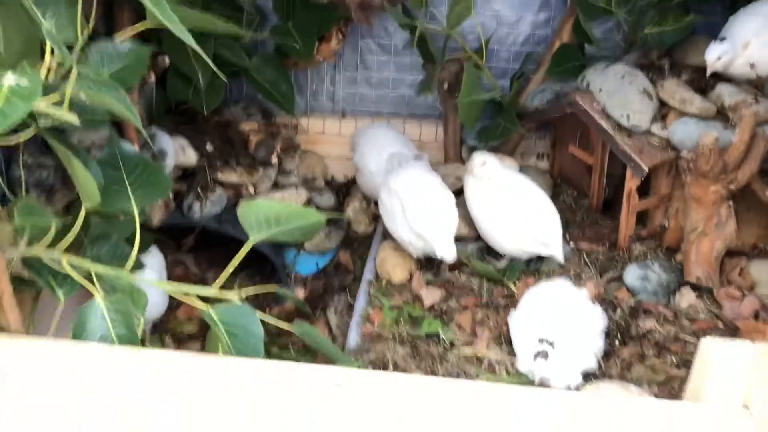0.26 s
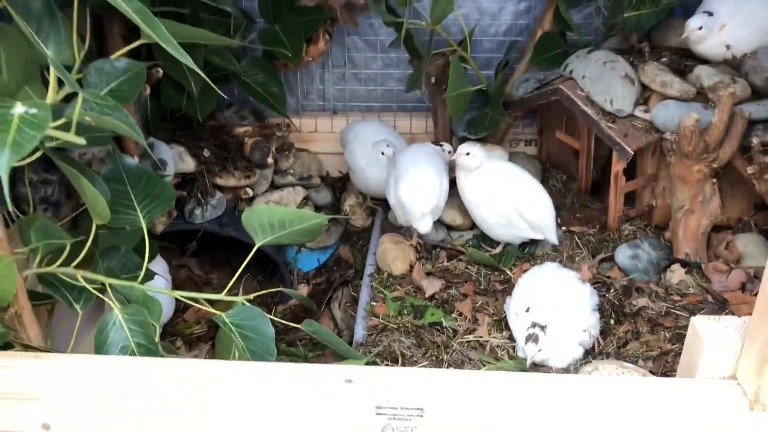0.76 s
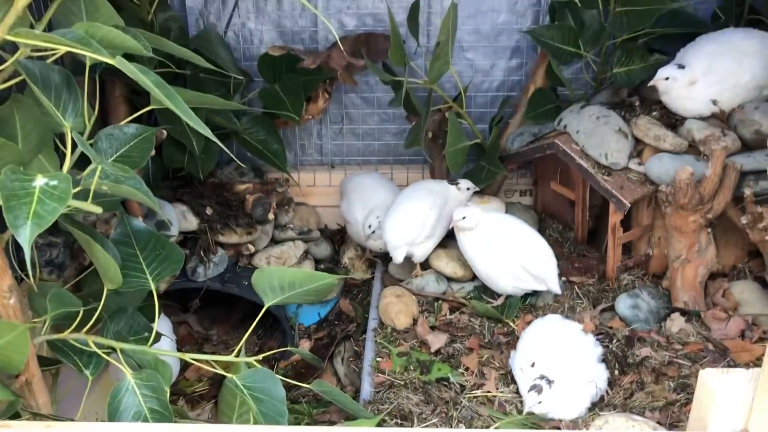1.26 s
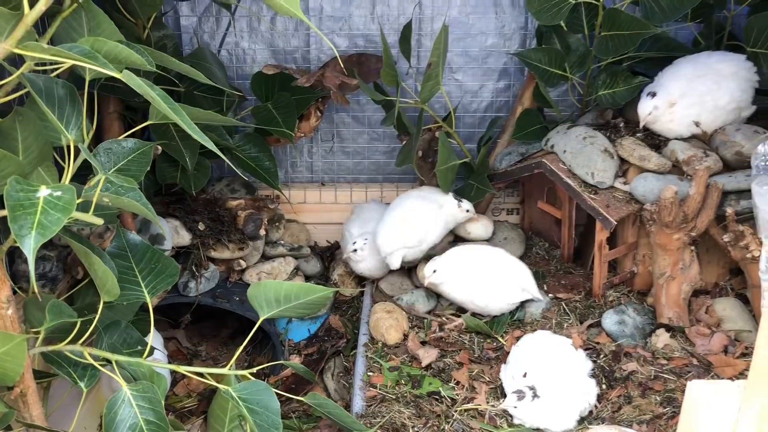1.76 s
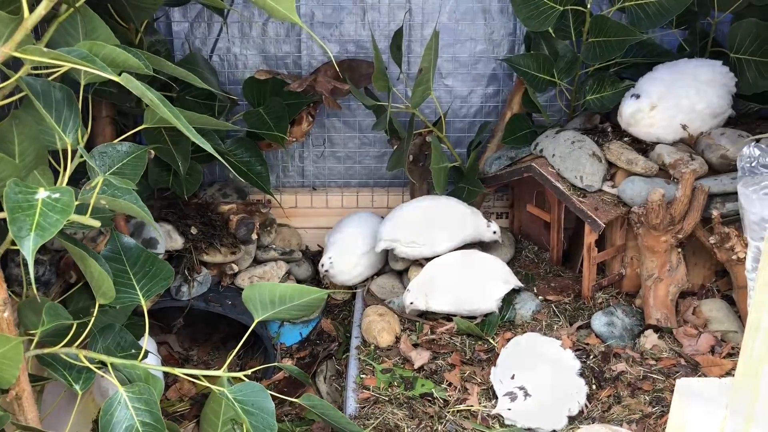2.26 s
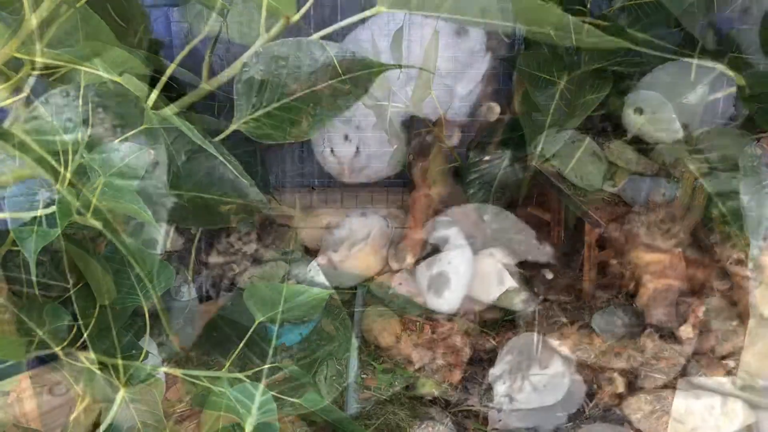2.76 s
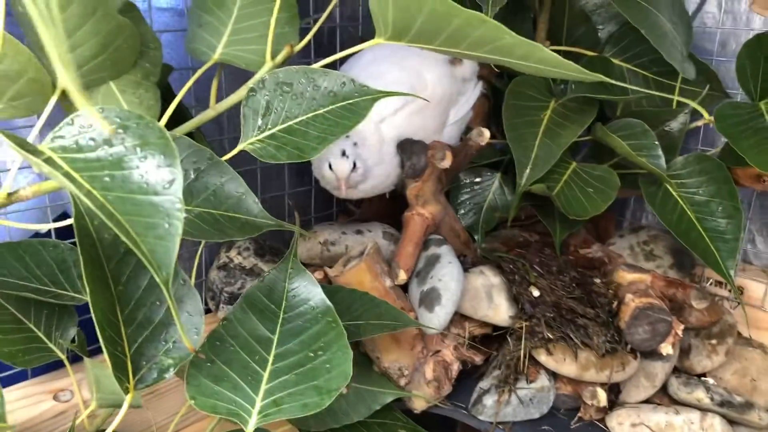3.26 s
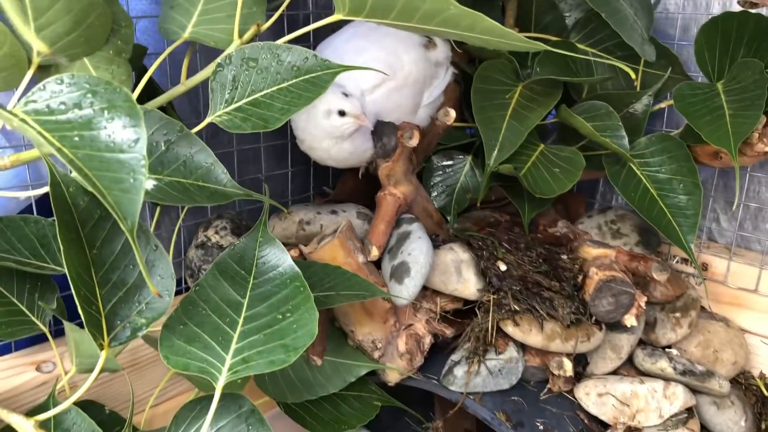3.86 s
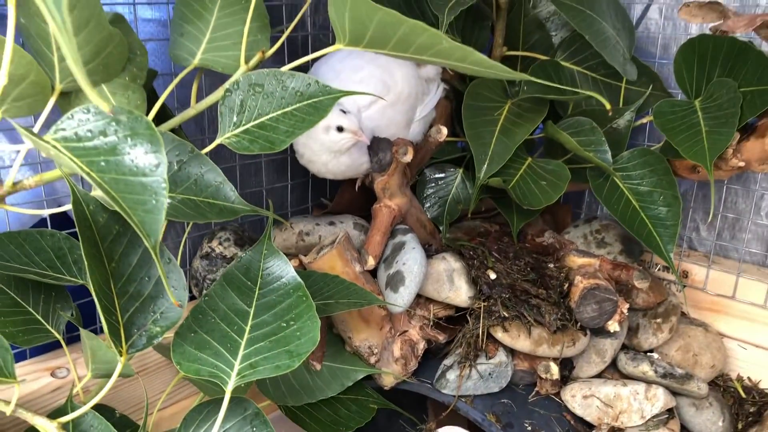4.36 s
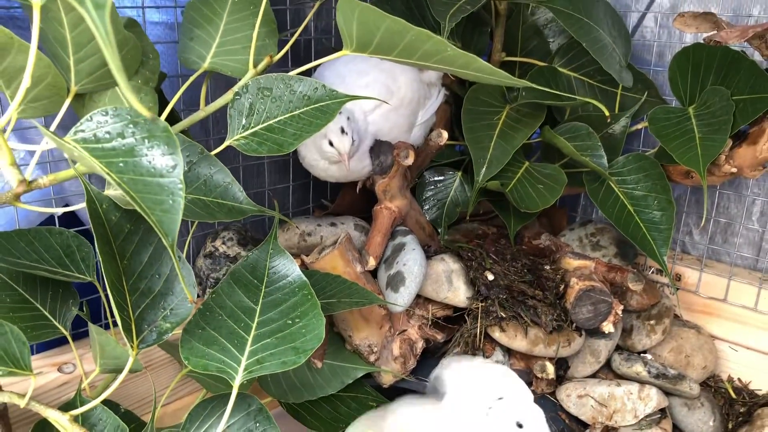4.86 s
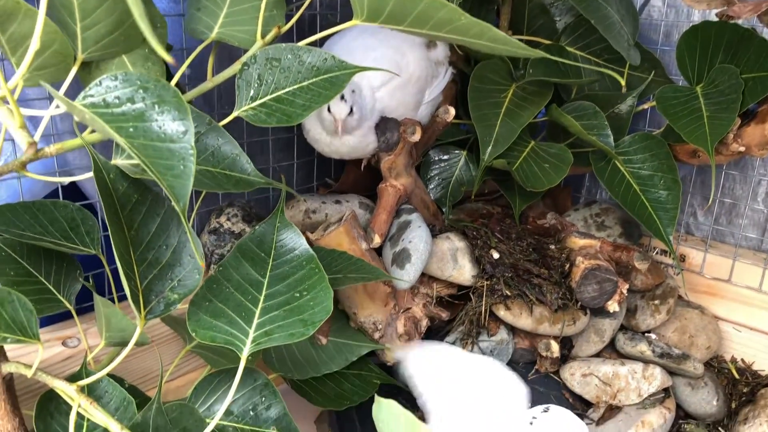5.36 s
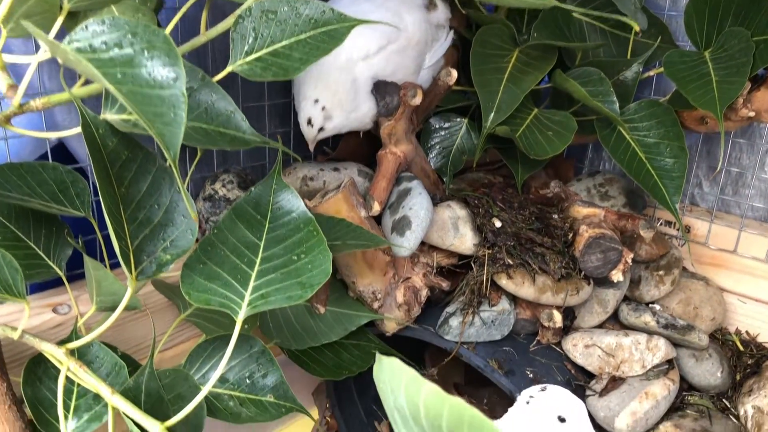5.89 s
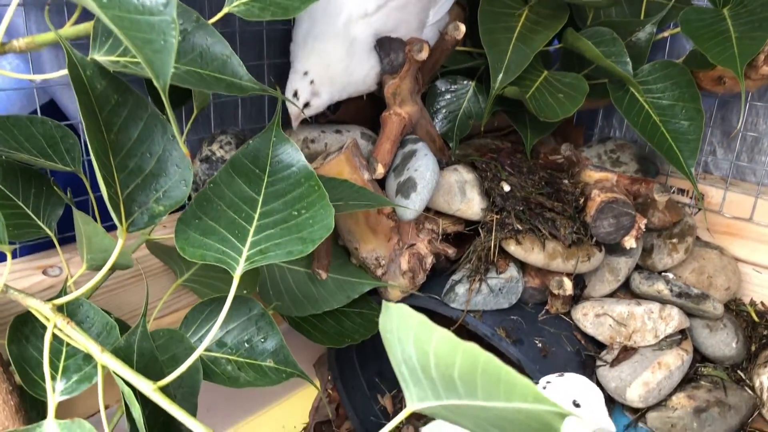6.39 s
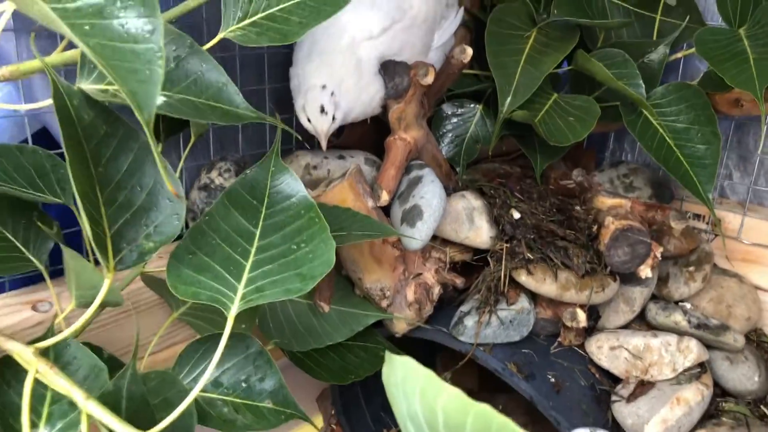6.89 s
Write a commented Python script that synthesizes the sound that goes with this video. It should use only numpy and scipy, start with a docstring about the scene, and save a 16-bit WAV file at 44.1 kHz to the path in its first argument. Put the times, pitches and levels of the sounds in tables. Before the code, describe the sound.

White quail rustle and crunch through dry leaf litter with crisp snaps, light bumps and tiny soft peeps, over a faint low outdoor rumble.

```python
"""Quail in a littered pen

Quail potter about in an outdoor pen littered with dry leaves, twigs and pebbles. Their feet crush and drag
the litter: filtered impulse trains and noise crackle finely, and short noise bursts make the sharp snaps.
Wavering sine tones are soft peeps; decaying sines are pings of the wire mesh and thuds on the ground.
Claws scrape as band-passed noise, and coloured noise gives a low outdoor rumble and a faint hiss."""
import sys
import numpy as np
from scipy import signal
from scipy.fft import rfft, irfft, next_fast_len
from scipy.io import wavfile
from scipy.ndimage import uniform_filter1d

SR = 44100
rng = np.random.default_rng(int(sys.argv[2]) if len(sys.argv) > 2 else 0)


def generate_wav(sig):
    """Save sig (samples, or channels by samples) to the path in sys.argv[1] as 16-bit PCM at SR."""
    pcm = np.round(np.clip(np.atleast_2d(sig).T, -1, 1) * 32767).astype(np.int16)
    wavfile.write(sys.argv[1], SR, pcm)


N = 314433
TIME = np.arange(N) / SR  # s

# Level of the outdoor rumble over time. Each row: time in seconds, level in dB before its random swell.
RUMBLE = [(0, -58), (.4, -61), (1.2, -60), (1.6, -61), (1.85, -64.5), (2, -60), (2.7, -65), (3.4, -59.5),
          (3.7, -62.5), (4.35, -59.5), (4.95, -60.5), (5.15, -64), (5.85, -63.5), (5.98, -53.5), (6.1, -63),
          (6.22, -59), (6.6, -62), (7.13, -61.5)]
# Spectra of rumble and hiss. Each row: frequency in Hz, relative density in dB per Hz.
RUMBLE_COLOUR = [(20, -30), (32, -18.5), (48, -2), (80, 1.5), (125, -1.5), (200, -6), (300, -11.5),
                 (500, -29.5), (1200, -66)]
AIR_COLOUR = [(100, -1.5), (400, 4.5), (1000, -5), (2500, -11), (6000, -15.5), (10000, -19), (16000, -20)]

# Wires of the mesh set ringing. Each row: start in seconds, frequency in Hz, level in dB, t60 in seconds.
PINGS = [(5.933, 2850, -38.5, 0.068), (5.985, 6780, -35, 0.051), (5.985, 1580, -22, 0.017)]
# Soft footfalls and bumps on the ground. Each row: start in seconds, frequency in Hz, level in dB,
# t60 in seconds.
THUDS = [(.471, 900, -27.5, 0.0079), (.62, 85, -48, .15), (2.954, 724, -26, 0.0089),
         (2.98, 480, -61, 0.027), (3.35, 547, -33.5, 0.033), (3.379, 875, -34.5, 0.044),
         (3.487, 1070, -37, .02), (3.94, 510, -45, 0.059), (4.086, 642, -43, 0.066),
         (4.65, 117, -43.5, 0.17), (4.91, 110, -48.5, 0.29), (5.97, 129, -32.5, 0.065),
         (6.2, 102, -44.5, 0.2), (7.026, 510, -45, .05)]
# Claws scraping on wood or stone. Each row: start in seconds, length in seconds, resonance in Hz, level in dB.
SCRAPES = [(3.777, 0.038, 2100, -57.5), (4.192, 0.029, 2130, -54), (4.398, 0.028, 1980, -55),
           (5.545, .027, 2080, -57.5)]

# Short peeps. Each row: start in seconds, length in seconds, pitch in Hz at start, middle and end,
# level in dB before the trim common to all peeps.
PEEPS = [ (.755, .06, 2550, 2250, 1720, -62), (.855, .04, 2520, 2120, 1830, -60),
         (1.02, .05, 2400, 2400, 2230, -59), (1.075, .035, 3070, 2980, 2700, -65),
         (1.405, .04, 2420, 2490, 2420, -65), (1.532, .072, 3050, 2230, 1780, -60),
         (1.61, .036, 3750, 3130, 2850, -62), (1.855, .085, 1170, 1620, 1500, -65),
         (1.968, .066, 2200, 2030, 1820, -62), (2.04, .026, 2700, 3800, 3300, -68),
         (2.91, .035, 3140, 2880, 2560, -61), (2.99, .03, 3320, 3080, 2750, -58),
         (3.435, .028, 3100, 2820, 2650, -43), (3.745, .055, 3240, 2600, 2050, -58),
         (4.995, .055, 1950, 1780, 1570, -62), (5.06, .075, 3240, 2300, 1760, -60),
         (5.143, .03, 3560, 3430, 3060, -55), (5.335, .052, 2960, 3290, 3000, -62),
         (6.668, .07, 2920, 2290, 1830, -55), (6.742, .03, 3740, 3460, 3080, -55)]
# Longer calls, a low note that flips up into a squeak. Each row: start in seconds, note length and squeak
# length in seconds, note and squeak pitch in Hz, note and squeak level in dB, climb in octaves per second.
RISING_CALLS = [(4.584, 0.048, 0.024, 1556, 3130, -54, -40.5, 2),
                (5.622, 0.065, 0.03, 2310, 3815, -52, -44.5, 3.1),
                (6.243, .041, .027, 1380, 2850, -52.5, -50.5, 17)]
FLIP_S, SAG_PER_S = .0016, 8  # time of the flip (s); relative fall of the squeak (per s)

# Spectra of the three litter layers. Each row: frequency in Hz, relative density in dB per Hz.
SOIL_COLOUR = [(100, -37), (220, -3), (350, -1), (800, 0), (1150, -2), (1500, -3), (2500, -33)]
BLADE_COLOUR = [(600, -64), (1000, -8), (1300, -1), (1800, 3.5), (2200, 0), (2900, 0.5), (3600, 2),
                (5500, -4)]
EDGE_COLOUR = [(1500, -29), (2500, -20), (3200, -6.5), (5000, 1), (7500, 0), (11000, -4), (16000, -6)]
# A foot pressed or dragged through the litter. Each row: start in seconds, length in seconds, level in dB,
# soil and crisp edges in dB relative to the leaf blades.
STROKES = [(0.071, 0.095, -50, 6, 5.5), (.16, 0.16, -52, 2, -1), (.34, 0.13, -57, 7, 1),
           (0.606, 0.076, -47.5, 2, 0), (.65, 0.095, -57, 7.5, -3), (1.2, .06, -66.5, 6, -1),
           (1.27, 0.11, -65.5, 3.5, 1), (1.53, 0.038, -66.5, 5.5, 3), (1.725, 0.032, -72.5, 0, 11),
           (1.985, 0.025, -57.5, -0.5, -9), (2.75, 0.076, -64, 5, -3), (2.92, .1, -65, 10, -6),
           (3.035, 0.04, -56, 4, 4), (3.175, .025, -69, 12.5, 6), (3.246, 0.068, -55, 2.5, 3),
           (3.295, 0.096, -42, -2.5, 0), (3.38, 0.092, -47, 4.5, 1.5), (3.469, 0.16, -51.5, 3.5, 0.5),
           (3.6, 0.14, -56, 0.5, 6.5), (3.76, .11, -63.5, -2.5, 0), (3.91, 0.085, -64.5, 2, 4),
           (4.075, 0.037, -60, 4.5, 0.5), (4.185, 0.063, -61.5, -2, 0), (4.28, 0.036, -66, 5.5, 3),
           (4.369, .06, -56, -5, 2.5), (4.48, .045, -50, -14, 0.5), (4.575, 0.07, -59, -7, 3.5),
           (4.79, 0.073, -58, -15, 5), (4.905, 0.05, -57, -8, 2), (5.151, .045, -63, -6, 4.5),
           (5.236, 0.051, -54.5, -13, -5), (5.421, 0.034, -60.5, 0.5, -4), (5.544, .03, -60.5, -3, 1),
           (5.869, 0.059, -46.5, -24, -15), (5.92, .14, -55, -7, 3.5), (6.16, 0.1, -60, 0, 4),
           (6.325, 0.059, -64.5, 8, 7), (6.55, 0.083, -53.5, -1.5, 1.5), (6.82, 0.08, -55, 0.5, 2.5),
           (6.9, 0.079, -54, -5, 3.5), (7.07, 0.078, -66, -12, 10)]
STROKE_SKEW, STROKE_ROUND = 0.77, 0.73  # weight comes on faster than it lifts; a lower power holds it longer
# How busily the litter is stirred between strokes. Each row: time in seconds, level in dB.
STIR = [(0, -66.5), (.55, -61.5), (.85, -64), (1, -68), (1.4, -73.5), (1.7, -78.5), (2.2, -81),
        (2.55, -72.5), (2.72, -84.5), (2.83, -66.5), (3.2, -70.5), (4.05, -74), (4.6, -67.5), (5.3, -72),
        (5.55, -74.5), (6.25, -68), (6.48, -73), (6.75, -68.5), (7.13, -66)]
# Gain of that stirring in soil, leaf blades and crisp edges, each in dB.
STIR_MIX_DB = [2, 1.5, 2.5]

# Snaps of leaf, twig or grit. Each row: start in seconds, level in dB, brightness in dB per band,
# low flexing in dB and after-crunch in dB, the last two relative to the snap.
SNAPS = [(0.007, -44.5, 1, -9, -24), (0.023, -47.5, 3.5, -16, 1), (0.031, -42, 4, -15, -27),
         (0.0528, -37.5, 9, -9.5, -25), (0.1883, -40.5, 5.5, -19, -24), (0.2155, -45, 1, -2, -4),
         (0.2852, -41.5, -0.5, -20, -9), (0.2961, -50, 5, -7, -11), (0.332, -50.5, -1, 0, -4),
         (0.3568, -47, 3, -16, -14.5), (0.3873, -44, 1.5, -12, -6), (0.4051, -46, -6, -19, -17),
         (0.4353, -48, 6, -20, -22), (0.4722, -40.5, -3.5, 1, -23), (0.517, -44, -0.5, -22, 1),
         (0.5356, -40, 3, -20, -12), (0.5484, -32.5, 9, -30, -21), (0.57, -40, 3.5, -23, -17),
         (0.6101, -40, 1.5, -12, 0.5), (0.644, -41.5, 4, -11, -9), (0.728, -50, 4, 0.5, -15),
         (0.7344, -45, 5, -14, -7), (0.7469, -45, 1, -20, -8), (0.777, -42, -8, -0.5, -29),
         (0.801, -47, -2, -9, -16), (0.8536, -50, 2, -16, -15), (0.9074, -39, -2, -15, -24),
         (0.9293, -49.5, 10, -25, -18), (1.08, -48, 2.5, -20, -20), (1.2072, -49.5, 2, 1, -12),
         (1.2298, -48.5, -1, -12, -23), (1.2907, -52.5, 7.5, -3, -16), (1.3377, -54, -1, -1, -1),
         (1.5012, -54, 1, -18, -10), (1.768, -56, -5.5, -8, 0), (2.0025, -47.5, -3.5, -7, -18),
         (2.2313, -63, 5, -9, -14), (2.27, -58, 1.5, -18, -16), (2.3241, -60.5, 2, -3, -6),
         (2.5991, -64, 7, -8, -17), (2.6262, -51, 3.5, -24, -13), (2.689, -53.5, 1.5, -18, -15),
         (2.7395, -55.5, -4, -16, -9), (2.8578, -50.5, 2.5, 2, -3), (2.8888, -48.5, -6, -5.5, -19),
         (2.9547, -36.5, -4, -9, -20), (2.9807, -38, -4, -4, -11), (3.0211, -42.5, 0, -12, -10),
         (3.047, -45, -4, -5, -10), (3.0533, -46, 10, -10, -15), (3.0551, -39.5, 0, -10, -20),
         (3.2388, -56, -2, -18, -6), (3.3809, -42, 5.5, 5, -4), (3.4335, -36, -1, -10, -11),
         (3.464, -47.5, 10, 2, -21), (3.5028, -37.5, -2, -5, -11), (3.5242, -48.5, 8.5, 1, -10),
         (3.5412, -40.5, 1, -8, -19), (3.5589, -40.5, -2.5, -17, -20), (3.5862, -43.5, -1, -16, -7),
         (3.6124, -42, 5, -19, -11), (3.641, -36.5, 1, -14, -20), (3.6832, -40, -2.5, -6, -17),
         (3.6972, -41.5, 0.5, -24, -22), (3.7585, -49.5, -1, -18, -23), (3.8395, -52.5, -3, -19, -13),
         (4.0155, -50.5, 0.5, -11.5, 7.5), (4.095, -52.5, 2, 0, -7), (4.117, -52, 1, -12, -12),
         (4.2473, -47.5, -1.5, -16, 3), (4.3631, -52, -3, -18, -11), (4.3828, -48, -6.5, -2, -15),
         (4.461, -47.5, 4, -22, -7), (4.5, -41, -6.5, -25, -8), (4.577, -47, 1, -13, 5.5),
         (4.6638, -63.5, -11, 12, 6.5), (4.777, -43.5, -5, -23, 5), (4.7879, -39.5, -1, -22, -2.5),
         (4.8089, -40.5, 1.5, -16, 1), (4.874, -48, 7.5, -19, -2), (4.9076, -41, -1, -3.5, 2),
         (4.9191, -44, -1, -12, 3.5), (5.0466, -49, -8, -13, -6), (5.2517, -56, -11, -3, -2),
         (5.332, -41.5, -4.5, -7.5, -18), (5.8967, -34, -2, -21, 1.5), (5.9021, -38, 2.5, -25, 6.5),
         (5.9329, -32, -3, -25, -5), (5.9363, -37, 0.5, -26, -4), (5.985, -28.5, -1, -26, -7),
         (5.991, -37, -5.5, -25, -16), (6.2557, -48.5, 1, -13, -20), (6.2672, -45.5, 0, -5, -23),
         (6.3107, -45.5, 4, -15, -19), (6.33, -53.5, -3, 2, 4), (6.4165, -44.5, 3.5, -14, -12),
         (6.4488, -53.5, -2.5, -10, -0.5), (6.5076, -49, 4.5, -25, -14), (6.5384, -52, 3, -3, -7),
         (6.5756, -48, 2, -18, -7), (6.6656, -51.5, -3, -6, -6), (6.741, -53.5, -4.5, -17, -5),
         (6.78, -53.5, -6, 4, -6), (6.8243, -43.5, -2.5, -18, -15), (6.833, -39, -3.5, -28, -2.5),
         (7.026, -43.5, 0, -5, -1.5), (7.0795, -45.5, 3, -2, -18)]
# Bands of a snap; slow flexing rings longer than fine fracture. Each row: low edge in Hz, high edge in Hz,
# decay time in seconds.
SNAP_BANDS = [(297, 1480, 0.0016), (1170, 3270, 0.00051), (2850, 7330, 0.00032), (6900, 15700, 0.00027)]
# Level of the upper three bands in a snap of middling brightness, each in dB.
SNAP_SHAPE_DB = [-4, -0.5, -2]
# Chance snaps of small bits: mean level above the stirring and its spread, spread of brightness per band
TICKS_PER_S, TICK_OVER_STIR_DB, TICK_SPREAD_DB, TICK_TILT_DB = 4, 13.5, 7, 3.5
TICK_FLEX_DB, TICK_CRUNCH_DB = -9, -8  # their low flexing and after-crunch

CUTOFF_HZ = 16100


def amp(db):
    """Level law: decibels to an amplitude ratio."""
    return 10 ** (np.asarray(db) / 20)


def unit(x):
    """Normalization: scales to rms 1."""
    return x / np.sqrt(np.mean(x ** 2) + 1e-20)


def add(mix, s, sound):
    """Superposition: adds a sound to the mix, in place, from s seconds on."""
    part = mix[max(round(s * SR), 0):][:len(sound)]
    part += sound[:len(part)]


def coloured(x, points):
    """Spectral shaping: weights x by a curve through (Hz, dB) points on a log axis, at rms 1."""
    hz, db = np.transpose(points)
    size = next_fast_len(N)
    bins = np.fft.rfftfreq(size, 1 / SR)
    gain = amp(np.interp(np.log(bins + 1), np.log(hz), db))
    return unit(irfft(rfft(x, size) * gain, size)[:N])


def band(x, low_hz, high_hz):
    """Causal band-pass: nothing sounds ahead of the excitation, so attacks stay sharp."""
    edges_hz = [low_hz, min(high_hz, .45 * SR)]
    return signal.sosfilt(signal.butter(3, edges_hz, "band", fs=SR, output="sos"), x)


def arch(length, skew, power):
    """Envelope: a warped half-sine swells from silence and trails off again."""
    u = np.linspace(0, 1, round(length * SR))
    return np.abs(np.sin(np.pi * u ** skew)) ** power


def outdoors(air_db=-70, rumble_db=0, swell_db=1, swell_s=.09):
    """Broadband noise: distant rumble of fluctuating level, under a faint even hiss."""
    swell = unit(uniform_filter1d(rng.standard_normal(N), size=round(swell_s * SR), mode="wrap"))
    level_db = np.interp(TIME, *np.transpose(RUMBLE)) + rumble_db + swell_db * swell
    rumble = amp(level_db) * coloured(rng.standard_normal(N), RUMBLE_COLOUR)
    hiss = amp(air_db) * coloured(rng.standard_normal(N), AIR_COLOUR)
    return rumble + hiss


def pen(x, top_hz=5000):
    """Scattering: sparse decaying echoes, short and dull, from boards, stones and plants."""
    t, t60 = np.arange(SR // 4) / SR, .17  # s
    chosen = rng.random(len(t)) < 2000 / SR  # about 2000 echoes per second
    taps = rng.standard_normal(len(t)) * chosen * (t > .003) * amp(-60 * t / t60)
    tail = band(taps, 190, top_hz)
    return signal.fftconvolve(x, tail / np.linalg.norm(tail))[:N]


def rings(table):
    """Damped resonance: struck things swell within a cycle and die away on one note."""
    out, t = np.zeros(N), np.arange(SR // 4) / SR
    for s, hz, db, t60 in table:
        envelope = amp(db - 60 * t / t60) * (1 - np.exp(-2 * hz * t))
        add(out, s, envelope * np.sin(2 * np.pi * hz * t))
    return out


def scrapes(half_width_octaves=0.27):
    """Friction: a claw's noisy rub over a hard surface excites one broad resonance of it."""
    out = np.zeros(N)
    grits = rng.standard_normal((len(SCRAPES), SR // 4))
    for (s, length, hz, db), grit in zip(SCRAPES, grits):
        press = arch(length, STROKE_SKEW, STROKE_ROUND)
        ring = unit(band(grit, hz / 2 ** half_width_octaves, hz * 2 ** half_width_octaves))
        add(out, s, amp(db) * press * ring[:len(press)])
    return out


def whistle(hz, gain, waver=0.016, rasp=0.56, rasp_hz=3400):
    """Modulated tone: a sine of unsteady pitch and strength turns raspy when pushed high."""
    noises = rng.standard_normal((3, SR // 4))
    wobble, flutter, sway = (unit(uniform_filter1d(noise, size=size))[:len(hz)]
                             for noise, size in zip(noises, (110, 36, 400)))  # sizes in samples
    strain = rasp * np.minimum(hz / rasp_hz, 1) ** 6
    strength = gain * amp(2 * sway) * (1 + strain * flutter)
    phase = 2 * np.pi * np.cumsum(hz * (1 + waver * wobble)) / SR
    return strength * np.sin(phase)


def rising_call(note_s, squeak_s, note_hz, squeak_hz, note_db, squeak_db, climb, onset_s=0.0049):
    """Register flip: a low note creeps upward, then flips into a squeak that sags and dies."""
    t = np.arange(0, note_s + squeak_s, 1 / SR)
    flip = .5 + .5 * np.tanh((t - note_s) / (2 * FLIP_S))  # 0 in the note, 1 in the squeak
    late = np.maximum(t - note_s, 0)
    low = note_hz * 2 ** (climb * (t - note_s / 2))
    high = squeak_hz * (1 - SAG_PER_S * late ** 2 / squeak_s)
    envelope = np.minimum(t / onset_s, 1) * np.cos(np.pi / 2 * (late / squeak_s) ** 2) ** 2
    level = amp(note_db + flip * (squeak_db - note_db))
    return whistle(low + flip * (high - low), envelope * level)


def peeps(peep_db=-1, rising_db=0):
    """Frequency glides: short peeps bend along parabolas, beside the longer rising calls."""
    out = np.zeros(N)
    for s, length, start_hz, middle_hz, end_hz, db in PEEPS:
        u = np.linspace(0, 1, round(length * SR))
        hz = np.polyval(np.polyfit([0, .5, 1], [start_hz, middle_hz, end_hz], 2), u)
        envelope = np.sin(np.pi * u ** 0.65)  # swells quickly, trails off
        add(out, s, whistle(hz, amp(db + peep_db) * envelope))
    for s, *call in RISING_CALLS:
        add(out, s, amp(rising_db) * rising_call(*call))
    return out


def crackle(per_s, spread_db, low_hz, high_hz, cycles, count=12):
    """Impulsive excitation: tiny fractures ring each kind of leaf fragment for a few cycles at its pitch."""
    t = np.arange(512) / SR
    struck = rng.random(N) < per_s / SR
    sizes = amp(spread_db * np.minimum(rng.exponential(1, N), 4)) * struck
    kind, out = rng.integers(0, count, N), np.zeros(N)
    sizes = sizes * rng.choice([-1, 1], N)
    for k, hz in enumerate(np.geomspace(low_hz, high_hz, count)):
        ring = np.exp(-t * hz / cycles) * np.sin(2 * np.pi * hz * t)
        out += signal.oaconvolve(sizes * (kind == k), np.sqrt(hz) * unit(ring))[:N]
    return unit(out)


def stirring(s):
    """Activity envelope: level in dB of the birds' shuffling at times s."""
    return np.interp(s, *np.transpose(STIR))


def footwork():
    """Power addition: steady stirring plus one swell per foot stroke drives soil, blades and edges."""
    power = amp(stirring(TIME) + np.array(STIR_MIX_DB)[:, None]) ** 2
    for s, length, db, soil_db, edge_db in STROKES:
        press = amp(db) * arch(length, STROKE_SKEW, STROKE_ROUND)
        for layer, share_db in zip(power, (soil_db, 0, edge_db)):
            add(layer, s, (amp(share_db) * press) ** 2)
    return np.sqrt(power)


def rustle(soil_db=0, blade_db=0, edge_db=0, dense_db=-45, rub=0.44):
    """Merging of impulses: soil, blades and edges crackle; hard scuffles blend the fractures into a rasp."""
    soil = crackle(per_s=1100, spread_db=2.8, low_hz=250, high_hz=1400, cycles=1.3)
    blades = crackle(per_s=1600, spread_db=2.8, low_hz=1000, high_hz=3600, cycles=1.3)
    edges = crackle(per_s=1100, spread_db=4.5, low_hz=2870, high_hz=14900, cycles=0.98)
    layers = ((soil_db, soil, SOIL_COLOUR), (blade_db, blades, BLADE_COLOUR), (edge_db, edges, EDGE_COLOUR))
    out = np.zeros(N)
    for strength, (db, grains, colour) in zip(footwork(), layers):
        merged = rub + strength / amp(dense_db)  # share of noise against separate fractures
        drive = (grains + merged * rng.standard_normal(N)) / np.sqrt(1 + merged ** 2)
        out += strength * amp(db) * coloured(drive, colour)
    return out


def shifting(x, patchy_db=3):
    """Varying resonance: as leaves bend and slide, patches of a few hundred Hz come and go."""
    spectrum = signal.stft(x, nperseg=256, noverlap=192)[2]
    patches = uniform_filter1d(rng.standard_normal(spectrum.shape), size=2, axis=0)  # over frequency
    patches = uniform_filter1d(patches, size=14, axis=1)  # over time
    gain = unit(amp(patchy_db * unit(patches)))
    return signal.istft(spectrum * gain, nperseg=256, noverlap=192)[1][:N]


def ticks():
    """Random events: small snaps at chance moments, louder where the litter is busier; rows as in SNAPS."""
    draws = rng.random((round(TICKS_PER_S * N / SR), 3))
    rows = []
    for s, (size, tilt) in zip(draws[:, 0] * N / SR, 2 * draws[:, 1:] - 1):
        db = stirring(s) + TICK_OVER_STIR_DB + TICK_SPREAD_DB * size
        rows.append((s, db, TICK_TILT_DB * tilt, TICK_FLEX_DB, TICK_CRUNCH_DB))
    return rows


def snaps(table, snap_db=0, crunch_db=0, crunch_s=0.0054, clump_db=3, tear_s=0.00034, give_s=0.0018):
    """Brittle fracture: a tear within a millisecond, then a clumpy crunch as the litter gives way."""
    out, t = np.zeros(N), np.arange(2048) / SR
    span = .003 * SR  # each level is the rms its energy would have over 3 ms
    crack, grit, clumps = rng.standard_normal((len(table), 3, len(t))).transpose(1, 0, 2)
    crack = crack * (1 - np.exp(-t / tear_s))
    clumping = amp(clump_db * unit(uniform_filter1d(clumps, size=40)))
    grit = grit * clumping * np.exp(-t / crunch_s) * (1 - np.exp(-t / give_s))
    for k, (low_hz, high_hz, decay_s) in enumerate(SNAP_BANDS):
        firsts = band(crack * np.exp(-t / decay_s), low_hz, high_hz)
        afters = band(grit, low_hz, high_hz)
        for (s, db, tilt_db, flex_db, after_db), first, after in zip(table, firsts, afters):
            sound = amp(snap_db) * unit(first) + amp(after_db + crunch_db) * unit(after)
            colour_db = flex_db if k == 0 else SNAP_SHAPE_DB[k - 1] + tilt_db * (k - 2)
            add(out, s, amp(db + colour_db) * np.sqrt(span / len(t)) * sound)
    return out


def scene(litter_wet_db=-22, peep_wet_db=-22):
    """Direct and scattered sound: birds and litter close by, with a little of the pen around them."""
    hits = snaps(SNAPS) + snaps(ticks()) + scrapes() + rings(PINGS) + rings(THUDS)
    calls = peeps()
    scatter = pen(amp(litter_wet_db) * hits + amp(peep_wet_db) * calls)
    return (hits + calls + scatter + shifting(rustle()) + outdoors())[None]


def record(dry):
    """Band limitation: a linear-phase low-pass ends the treble at the cutoff."""
    lowpass = signal.firwin(301, CUTOFF_HZ, window=("kaiser", 8), fs=SR)
    return signal.oaconvolve(dry, lowpass[None], "same")


dry = scene()
out = record(dry)
generate_wav(out)
```